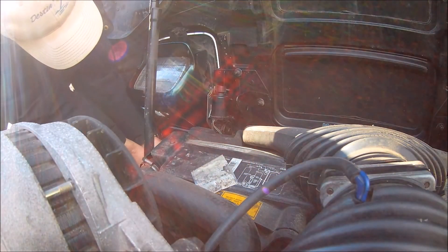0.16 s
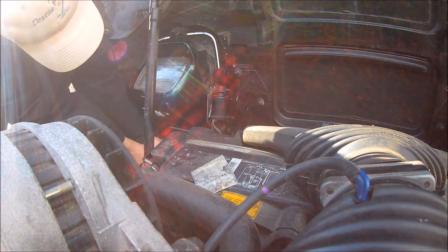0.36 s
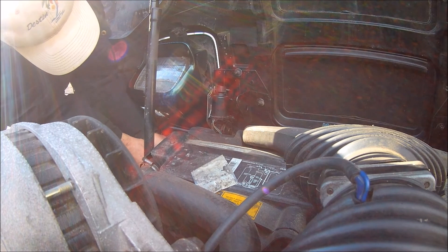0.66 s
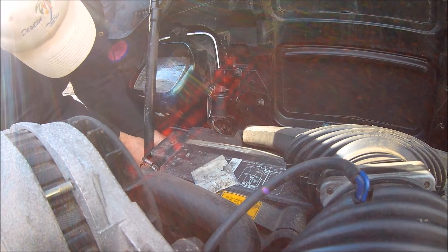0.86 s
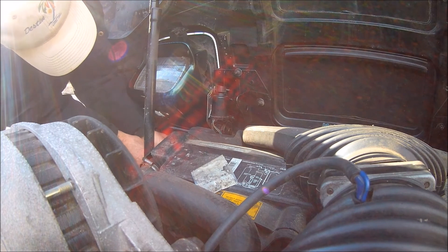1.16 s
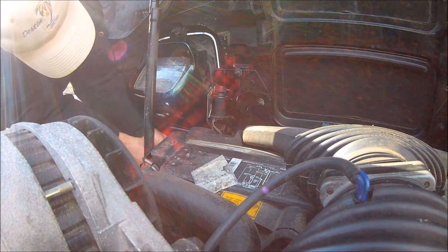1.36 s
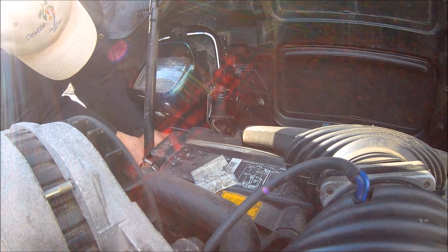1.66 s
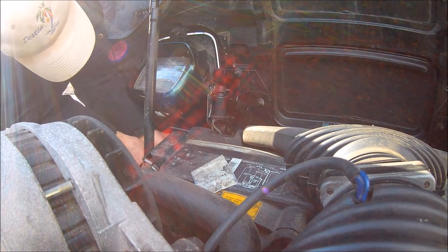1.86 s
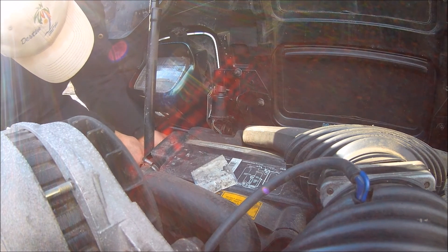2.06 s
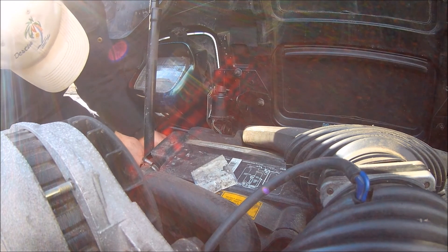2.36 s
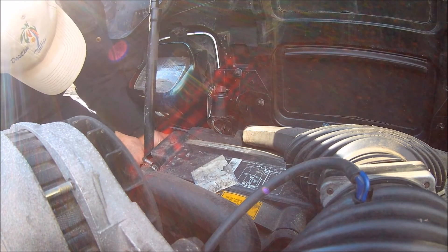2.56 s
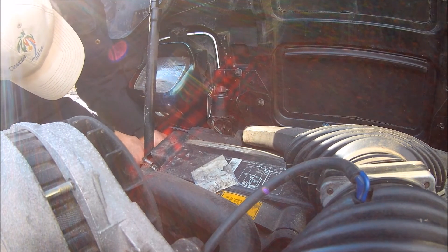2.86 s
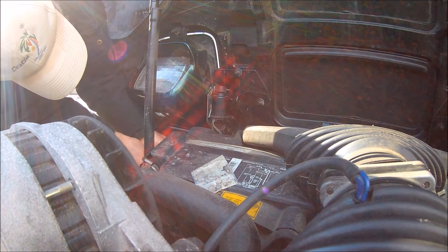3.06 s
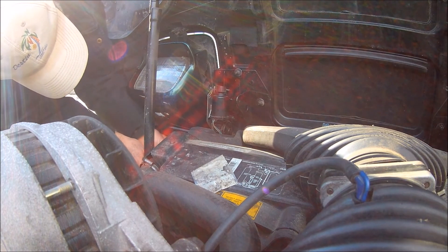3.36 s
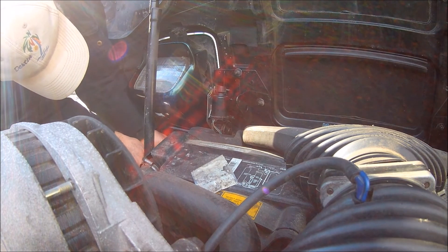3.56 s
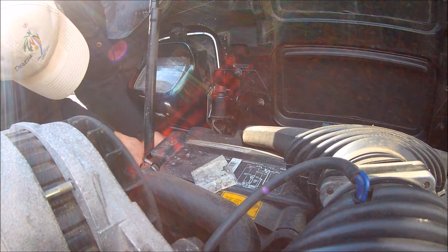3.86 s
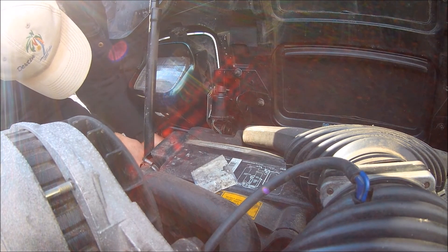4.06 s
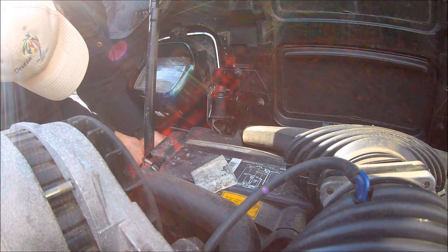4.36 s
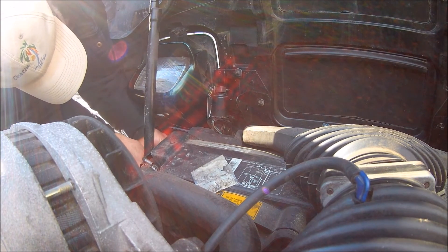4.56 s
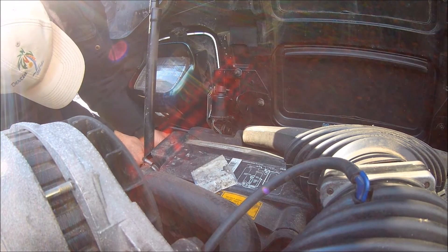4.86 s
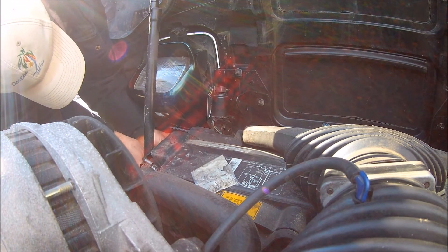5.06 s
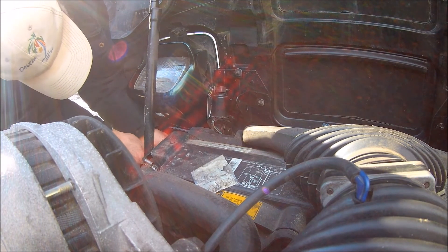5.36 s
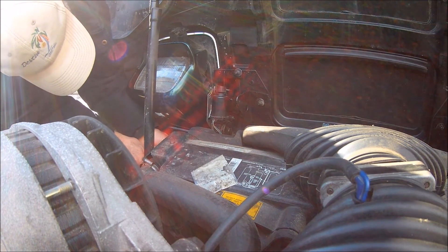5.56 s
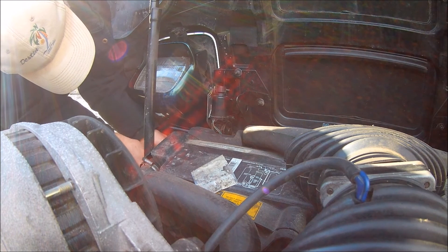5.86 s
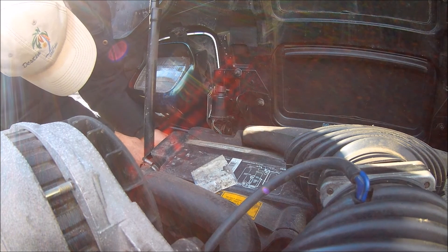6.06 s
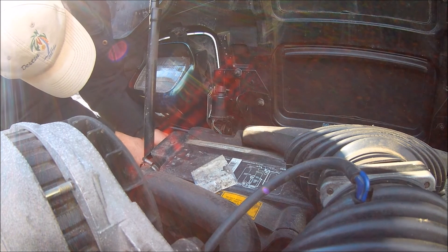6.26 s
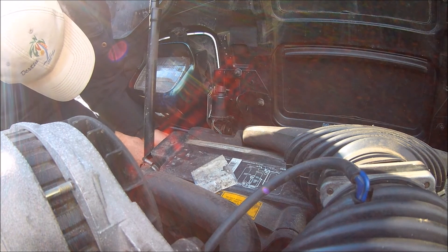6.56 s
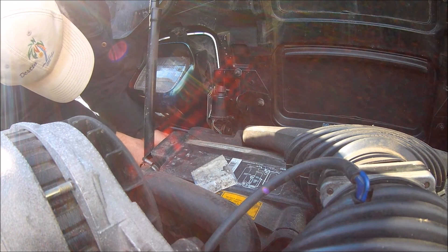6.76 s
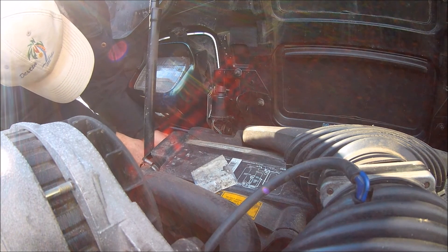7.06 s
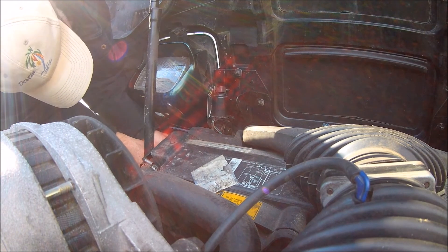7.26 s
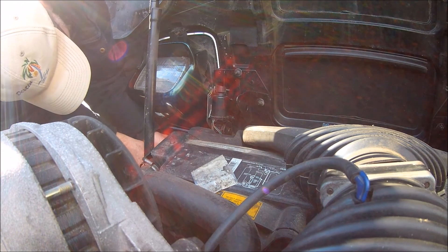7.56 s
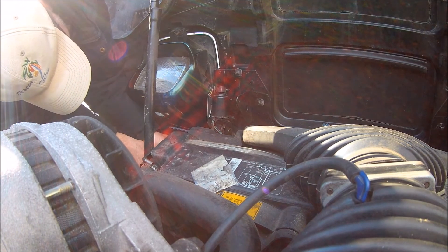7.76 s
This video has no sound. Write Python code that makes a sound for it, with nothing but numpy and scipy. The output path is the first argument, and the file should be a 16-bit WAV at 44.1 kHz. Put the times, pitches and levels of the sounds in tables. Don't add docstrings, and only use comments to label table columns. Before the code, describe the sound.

Close to a tool in an open engine bay, a ratchet gives a quick run of small steel ticks at 0.35 s, then its handle clanks on metal at 0.5. Another ticking run at 1.05 leads to a louder clank at 1.2. Ticks around 1.6 precede a softer knock at 1.9; a run at 2.35 ends in the hardest blow at 2.5, with a lighter one at 2.8. Rasping clicks follow at 3.1-3.25 and scattered ticks at 3.5-4. Strong clanks come at 4.3 and 5.45, a lighter one at 4.85, each after ticking. From 6 to 7.3 the knocks, bumps and ticks crowd together, with clanks at 6.25, 6.65 and 7.15, thinning by 7.7. Panels ring dully and briefly. Wind gusts and far traffic rumble low throughout; a distant engine hum swells faintly near 7.3. The camera sound is muffled, with treble dropping out momentarily.

```python
import sys
import numpy as np
from scipy import signal
from scipy.fft import rfft, irfft
from scipy.io import wavfile
from scipy.ndimage import uniform_filter1d, map_coordinates

SR = 44100
rng = np.random.default_rng(int(sys.argv[2]) if len(sys.argv) > 2 else 0)


def boost_factor(decibels):
    exponent = np.asarray(decibels, float) / 20
    return 10 ** exponent


def inscribe(sig):
    pcm = np.round(np.clip(np.atleast_2d(sig).T, -1, 1) * 32767)
    wavfile.write(sys.argv[1], SR, pcm.astype(np.int16))


N = 349272


def place(times, gains):
    out = np.zeros(N)
    np.add.at(out, (np.asarray(times) * SR).astype(int), gains)
    return out


def fade(clicks, t60, rise_s=0.0002):
    tail = signal.lfilter([1], [1, -boost_factor(-60 / (t60 * SR))], clicks + 1e-18)
    r = np.exp(-1 / (rise_s * SR))
    return signal.lfilter([1 - r], [1, -r], tail)


def band(x, low_hz, high_hz):
    return signal.sosfilt(signal.butter(2, [low_hz, high_hz], "band", fs=SR, output="sos"), x)


def flicker(depth_db, rate):
    points = rng.standard_normal(500)
    coarse = map_coordinates(points, [np.arange(N // 64 + 2) * 64 * rate / SR], order=3)
    return np.interp(np.arange(N) / 64, np.arange(len(coarse)), boost_factor(depth_db * coarse))


def coloured(spectrum, patchy_db, rate):
    hz, db = np.transpose(spectrum)
    edges = 12 * 2 ** np.arange(0, 10.3, 1 / 3)
    white, out = rng.standard_normal((2, N)), 0
    for k, (low, high) in enumerate(zip(edges, edges[1:])):
        level_db = np.interp(np.log(low * high) / 2, np.log(hz), db, left=-99)
        if level_db > -60:
            out = out + boost_factor(level_db) * flicker(patchy_db, rate) * band(white[k % 2], low, high)
    return out / out.std()


def ring(times, level_db, modes, bursts, scatter_db, spread_s=.001):
    out, at = np.zeros(N), (np.asarray(times) * SR).astype(int)
    luck = rng.standard_normal((len(at), len(modes)))
    signs = rng.choice([-1, 1], (len(at), len(modes)))
    latest = np.maximum(np.searchsorted(at, np.arange(N), side="right") - 1, 0)
    lags = (rng.random(len(modes)) * spread_s * SR).astype(int)
    for (hz, db, t60), own, sign, lag in zip(modes, luck.T, signs.T, lags):
        force = bursts * (sign * boost_factor(level_db + db + scatter_db * own))[latest]
        r, w = boost_factor(-60 / (t60 * SR)), 2 * np.pi * hz / SR
        mode = signal.lfilter([0, np.sin(w)], [1, -2 * r * np.cos(w), r * r], force + 1e-18)
        out[lag:] += mode[:N - lag]
    return out


# f/Hz, level/dB per Hz
HISS_SPECTRUM = [(1180, -28), (2000, -16), (3270, -3.5), (3840, 0), (7950, -6), (10600, -4.5), (12000, 1),
                 (12500, -35), (16200, -65), (22000, -120)]


def hiss():
    return boost_factor(-75) * flicker(1.0, 4.3) * coloured(HISS_SPECTRUM, patchy_db=1.0, rate=13.0)


# f/Hz, level/dB per Hz
TRAFFIC_SPECTRUM = [(59, -1), (100, 2), (192, -4.5), (291, -3), (340, -8.5), (446, -4), (514, -9.5),
                    (584, 0), (654, -4), (1000, -9), (1900, -36.5), (2130, -75), (3000, -88), (3900, -54.5),
                    (6600, -120)]


def traffic():
    return boost_factor(-41.5) * flicker(0.66, 3.0) * coloured(TRAFFIC_SPECTRUM, patchy_db=2.62, rate=17.0)


# f/Hz, level/dB per Hz
WIND_SPECTRUM = [(8.8, -39), (15, 4), (38, 0), (58, 6.5), (97, -9.5), (161, -5.5), (200, -35.5), (260, -81),
                 (440, -120)]
# t/s, level/dB
WIND_GUSTS = [(0.0, -65), (0.44, -45.5), (1.3, -46.5), (1.32, -31.5), (1.68, -41.5), (1.72, -37.5),
              (1.79, -40), (1.96, -32.5), (2.05, -44.5), (2.29, -36), (2.82, -56), (3.2, -45),
              (6.81, -46.5), (6.9, -67), (7.06, -35), (7.79, -63), (7.81, -44), (7.92, -59)]


def wind():
    gust_db = np.interp(np.arange(N) / SR, *np.transpose(WIND_GUSTS))
    return boost_factor(gust_db) * coloured(WIND_SPECTRUM, patchy_db=3.5, rate=14.0)


def far_engine():
    middle_s, long_s, hz = 7.28, 0.29, 74.7
    hum = band(rng.standard_normal(N), hz * 0.93, hz * 1.13)
    hum = band(hum, hz * 0.89, hz * 1.23)
    swell = np.exp(-((np.arange(N) / SR - middle_s) / long_s) ** 2)
    return boost_factor(-39) * hum / hum.std() * swell


# t/s, panel level/dB, then relative to it bay/dB, bracket/dB, top/dB
HANDLE_BLOWS = [(0.47, -7, -11.5, -6, -22), (1.204, -3, -20, -10.5, -21.5), (1.917, -20, -22, -26, -45),
                (2.5005, 0, -22.5, -21, -17), (2.776, -16, -15, -11, -21), (4.2683, -1, -19.5, -15.5, -20),
                (4.852, -16.5, -16.5, -11.5, -19), (5.4507, -2, -14.5, -11.5, -15),
                (6.2628, -16.5, -3, -12.5, -18.5), (6.655, -8, -9, -11.5, -53), (7.166, -4, -17, -13, -23)]
# bay/dB, bracket/dB, tool/dB, top/dB
BOUNCE_COLOUR = [0, -27.5, -26.5, -39]
# t/s, panel level/dB, then relative bay/dB, bracket/dB, tool/dB
BODY_NUDGES = [(0.932, -66, 34, -18, -30), (1.602, -50.5, 15.5, -15, -31), (2.198, -45, 0, -20, -24),
               (2.228, -53.5, 11, -19, -24), (2.989, -64, 22.5, -16, -38), (3.113, -43.5, 7.5, -15, -9),
               (3.211, -47, -3, -12, -4), (3.255, -56.5, 20.5, -13, -4), (3.328, -62, 27, -18, -36),
               (3.974, -33, 5, -9.5, -28), (4.477, -33.5, 4, -14, -20), (4.592, -38, 1, -20, -42),
               (5.266, -33.5, 5, -40, -41), (5.874, -51.5, 9.5, -5, -21), (6.031, -28.5, 3.5, -42, -36),
               (6.524, -25.5, 2, -35, -30), (6.767, -32.5, 5.5, -14, -23), (7.043, -31.5, 4.5, -37, -36),
               (7.286, -26, -2, -13.5, -26), (7.334, -51, 7, -18, -34), (7.704, -34, 7.5, -26, -24)]


def contacts():
    rows = []
    for s, db, bay, bracket, top in HANDLE_BLOWS:
        tool = -15.5 + 0.2 * top
        rows.append((s, db, bay, bracket, tool, top))
        rows.append((s + .033, db - 29.5, *BOUNCE_COLOUR))
    for s, db, bay, bracket, tool in BODY_NUDGES:
        rows.append((s, db, bay, bracket, tool, tool - 5))
    return np.transpose(sorted(rows))


# f/Hz, level/dB, t60/s
BAY_MODES = [(156, -4.5, .16), (265.6, -1, 0.077), (300, 1, 0.26), (370.8, -6, 0.27)]
SHELL_MODES = [(461, 3.5, 0.11), (489.5, -6, 0.24), (563.8, 3.5, 0.12)]
PANEL_MODES = [(645, -11, .09), (710, -9, .09), (770, -5, .11), (836, -5, .1), (895, -9, .09),
               (1012, -1, .12), (1108, 1, .11), (1162, -2, .09), (1222, -4, .08), (1292, -6, .08)]
BRACKET_MODES = [(1407, 0, .1), (1516, -5, .08), (1625, -8, .08), (1746, -8, .1), (1937, -7, .09),
                 (2183, -12, .1), (2298, -10, .09)]
TOOL_MODES = [(2608, 14, 0.06), (3050, 15.5, 0.05), (3560, 21, 0.035), (3960, 20, 0.03), (4265, 20, 0.03),
              (4650, 17, 0.04), (5240, 15, 0.04), (5600, 17, 0.03), (5900, 12, 0.04)]
HEAD_MODES = [(6600, 4, 0.05), (6490, 10, 0.013), (6800, 13.5, 0.056), (7000, 10.5, 0.035),
              (8230, -11, 0.028), (8570, 4, 0.034), (10540, -12, .04), (11600, -4, .04)]


def knocks():
    s, panel_db, bay_db, bracket_db, tool_db, top_db = contacts()
    bay_db, bracket_db = panel_db + bay_db, panel_db + bracket_db
    tool_db, top_db = panel_db + tool_db, panel_db + top_db
    shell_db = panel_db + 0.81 * (bay_db - panel_db)

    rattle_s, step = 0.0087, np.arange(4000) / SR
    rattle_shape = np.exp(-step / rattle_s) / np.sqrt(rattle_s * SR)
    rattle, blow = np.zeros(N), place(s, 0.71)
    for at in (s * SR).astype(int):
        rattle[at:at + 4000] = rng.standard_normal(4000) * rattle_shape

    out = ring(s, panel_db - 9, PANEL_MODES, .7 * blow + rattle, scatter_db=1.5, spread_s=.0012)
    out += ring(s, bracket_db, BRACKET_MODES, blow + .5 * rattle, scatter_db=2.5, spread_s=0.00263)
    out += ring(s, top_db - 20, HEAD_MODES, .4 * blow + rattle, scatter_db=-3.5, spread_s=0.0022)
    out += ring(s, shell_db - 4.5, SHELL_MODES, blow + 0.66 * rattle, scatter_db=2.5, spread_s=0.00617)
    out += ring(s, bay_db - 0.5, BAY_MODES, blow + 0.13 * rattle, scatter_db=0.0, spread_s=.008)
    out += ring(s, tool_db - 18.5, TOOL_MODES, 0.47 * blow + 0.72 * rattle, scatter_db=4.0, spread_s=0.00313)

    white = rng.standard_normal(N)
    out += band(white, 795, 1506) * fade(place(s, boost_factor(panel_db + 5.5)), 0.099, rise_s=0.00079)
    out += band(white, 1600, 2360) * fade(place(s, boost_factor(bracket_db + 1.5)), 0.076, rise_s=0.00087)
    out += band(white, 200, 400) * fade(place(s, boost_factor(bay_db + 13.0)), 0.18, rise_s=0.0089)
    out += band(white, 1400, 5600) * fade(place(s, boost_factor(tool_db - 0.5)), 0.047, rise_s=0.00053)
    out += band(white, 6040, 12500) * fade(place(s, boost_factor(top_db - 3.5)), 0.049, rise_s=0.0015)
    loose_parts = fade(place(s, boost_factor(tool_db - 9.5)), 0.17, rise_s=0.004) * flicker(2.2, 45.0)
    out += band(white[::-1], 1500, 6000) * loose_parts
    return signal.sosfilt(signal.butter(3, 130, "high", fs=SR, output="sos"), out)


# first tooth t/s, last tooth t/s, first level/dB, last level/dB, relative socket ring/dB
BACK_SWINGS = [(0.343, 0.426, -50.5, -48, 1), (1.0383, 1.165, -50.5, -47.5, 5),
               (1.571, 1.588, -49, -48, -3), (1.619, 1.714, -51.5, -52, 5.5), (2.351, 2.4645, -46, -49, 5),
               (3.093, 3.202, -51.5, -53, 11), (3.209, 3.258, -42, -55.5, 6.5), (4.135, 4.227, -55, -43, 8),
               (4.67, 4.7795, -48.5, -47.5, 12.5), (5.3275, 5.406, -52.5, -47.5, 11),
               (6.059, 6.1357, -45.5, -51, 10)]
TEETH_PASSED = [7, 12, 3, 6, 11, 8, 7, 6, 9, 4, 4]
# t/s, peak level/dB, then relative socket ring/dB, fizz/dB
SINGLE_TICKS = [(1.7715, -58.5, 16, -12), (1.8286, -57.5, 9, 1), (2.1964, -57.5, 20.5, -11),
                (3.5055, -56.5, 10, -2), (3.6598, -50, 14, -1), (3.708, -49, 8, -1),
                (3.7435, -49.5, 14.5, 1.5), (3.9354, -53.5, 16, -8), (3.9788, -62, -3, 4),
                (4.496, -47.5, 9.5, -3), (4.8147, -53, 12, -7), (1.41, -63, 18, -10), (5.69, -60, 13, -6),
                (5.8327, -58.5, -2, -3), (5.8663, -59, 16.5, -24), (6.5222, -59, 24, -15),
                (6.5648, -48, 14, -4), (6.6256, -45, 18, -2), (6.763, -57, 20, -10), (6.8117, -59, 0, 4),
                (6.8268, -57, 13, 8), (6.8353, -41.5, 9, -0.5), (7.0408, -66, 3, 6), (7.0993, -48, 14, -1),
                (7.131, -55, 0, -12), (7.2913, -53, 1, -10), (7.6999, -53.5, 13, -4)]


def teeth():
    rows = list(SINGLE_TICKS)
    for (first_s, last_s, first_db, last_db, socket_db), count in zip(BACK_SWINGS, TEETH_PASSED):
        luck, way = rng.standard_normal((4, count)), np.linspace(0, 1, count)
        jitter = 2 * 0.11 * way * (1 - way) * luck[0] / count
        s = first_s + (last_s - first_s) * (way ** 1.1 + jitter)
        off_db = 2.5 * luck
        peak_db = first_db + (last_db - first_db) * way + off_db[1]
        rows += zip(s, peak_db, socket_db + off_db[2], off_db[3] - 3)
    return np.transpose(sorted(rows))


# f/Hz, level/dB, t60/s
PAWL_MODES = [(2960, -9, .01), (3800, 5, .013), (4100, 2, .011), (4500, -5, .01), (5190, -5, .012),
              (5780, -6, .008), (6780, -4, .011), (7300, -7, .009)]
# f/Hz, level/dB, t60/s
SOCKET_MODES = [(1350, -5, .035), (1650, -4, .045), (1920, 0, .055), (2150, -5, .04), (2400, -3, .05),
                (2700, -7, .035), (3100, -9, .04)]


def ratchet():
    s, peak_db, socket_db, fizz_db = teeth()
    socket_db, fizz_db = peak_db + socket_db, peak_db + fizz_db
    scrape = 0.13 * rng.standard_normal(N) * fade(place(s, 0.32), 0.1)
    snaps = place(s, 0.89) + scrape
    out = ring(s, peak_db - 7, PAWL_MODES, snaps, scatter_db=3.0, spread_s=.002)
    out += ring(s, socket_db - 16, SOCKET_MODES, snaps, scatter_db=5.5, spread_s=0.0044)
    white = rng.standard_normal(N)
    out += band(white, 570, 1800) * fade(place(s, boost_factor(socket_db + 2.0)), 0.099, rise_s=0.00078)
    out += band(white, 2100, 9800) * fade(place(s, boost_factor(peak_db + 2)), 0.048)
    out += band(white, 8400, 18000) * fade(place(s, boost_factor(fizz_db + 3.5)), 0.052)
    return out


def scene():
    notch = signal.butter(2, [7850, 8600], "bandstop", fs=SR, output="sos")
    tool = signal.sosfilt(notch, knocks() + ratchet())
    return (tool + wind() + traffic() + hiss() + far_engine())[None]


def reframe(x, centres_s, hop_s, change):
    size = 2 * int(hop_s * SR)
    at = (np.asarray(centres_s) * SR).astype(int)[:, None] + np.arange(size) + size // 2
    window = np.sin(np.pi * (np.arange(size) + .5) / size)
    out = np.pad(x, (size, 2 * size))
    spectra = rfft(out[at] * window)
    added = irfft(change(spectra, np.fft.rfftfreq(size, 1 / SR)), size)
    np.add.at(out, at, added * window)
    return out[size:size + N]


def smear_attacks(x):
    def noise(spec, hz):
        size = np.abs(spec)
        load_db = 20 * np.log10(size.mean(axis=1, keepdims=True) + 1e-6)
        tilt_db = -24.5 + 24 * hz ** 2 / (hz ** 2 + 3100 ** 2)
        share = boost_factor(0.23 * load_db + tilt_db)
        return share * uniform_filter1d(size, size=15) * np.exp(2j * np.pi * rng.random(spec.shape))
    hop_s = 1024 / 48000
    centres_s = np.arange(int(N / SR / hop_s) + 1) * hop_s + .0044
    return reframe(x, centres_s, hop_s, noise)


DULL_MOMENTS = [.029, .252, .592, .9, 1.274, 1.745, 1.881, 2.214, 2.607, 2.821, 2.949, 3.801, 4.007, 4.325,
                4.56, 4.793, 5.028, 5.926, 5.999, 6.116, 6.379, 6.48, 6.597, 6.639, 6.741, 6.886, 7.28,
                7.407, 7.59, 7.791]
# start t/s, frames in a row [count]
DULL_RUNS = [
    (2.708, 3),
    (3.601, 4),
]


def drop_treble(x):
    def thin(spec, hz):
        size = np.abs(spec)
        strong = size > boost_factor(7.0 + hz / 4000) * uniform_filter1d(size, size=60)
        kept = uniform_filter1d(1. * strong, size=3) > .1
        return spec * (hz > 2050) * (boost_factor(6) * kept - 1)
    runs = [s + .0145 * k for s, count in DULL_RUNS for k in range(count)]
    return reframe(x, list(DULL_MOMENTS) + runs, 0.0135, thin)


def low_pass(x):
    return signal.sosfilt(signal.butter(12, 13230, fs=SR, output="sos"), x)


def record(dry):
    x = 0.87 * np.tanh(dry[0] / 0.88)
    x = drop_treble(smear_attacks(x))
    x = signal.sosfilt(signal.cheby2(12, 38, 12500, fs=SR, output="sos"), x)
    return low_pass(x[None])


dry = scene()
out = record(dry)
inscribe(out)
```